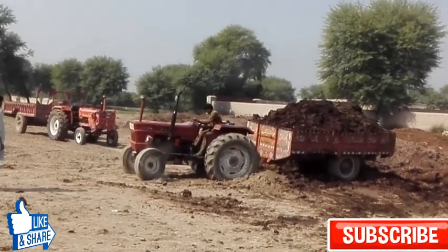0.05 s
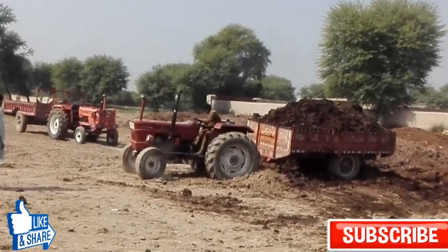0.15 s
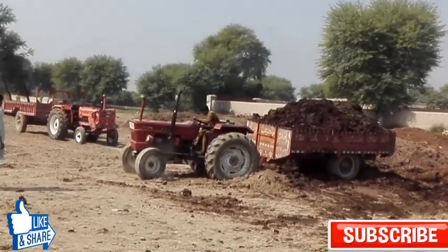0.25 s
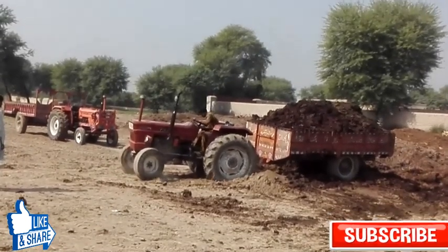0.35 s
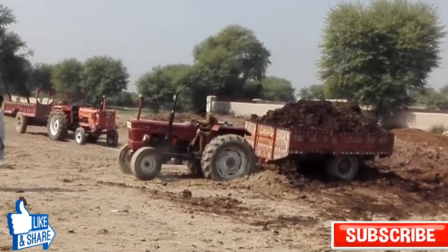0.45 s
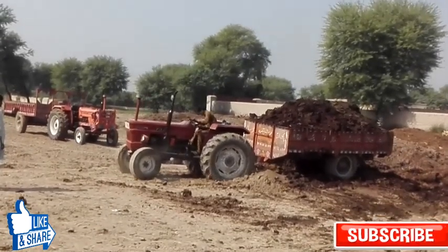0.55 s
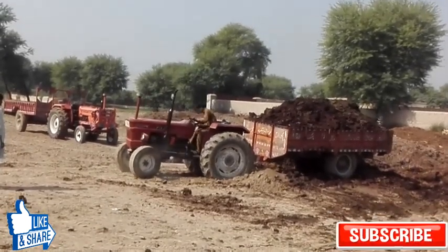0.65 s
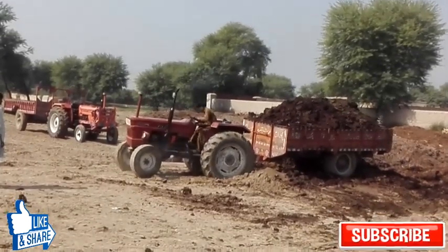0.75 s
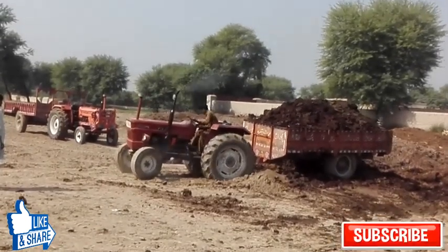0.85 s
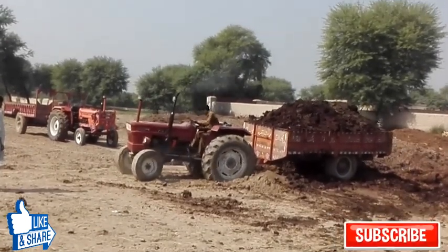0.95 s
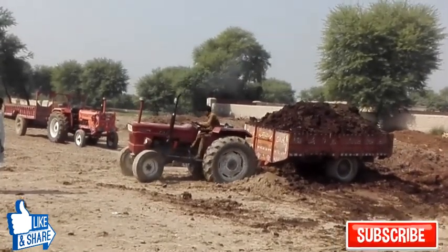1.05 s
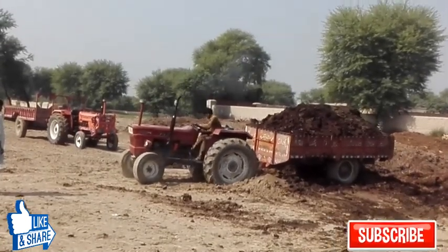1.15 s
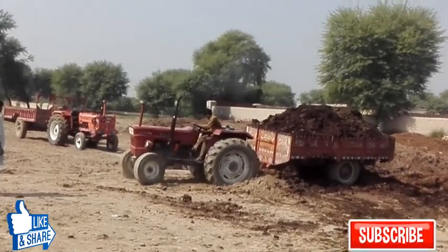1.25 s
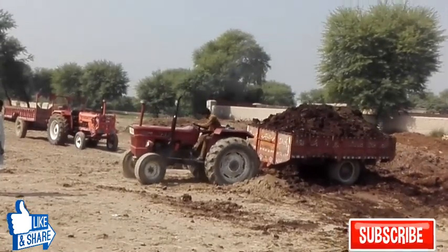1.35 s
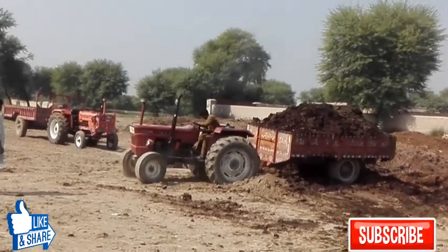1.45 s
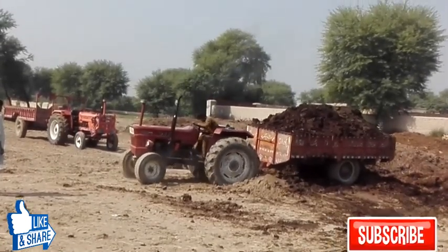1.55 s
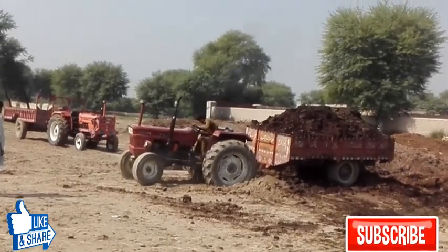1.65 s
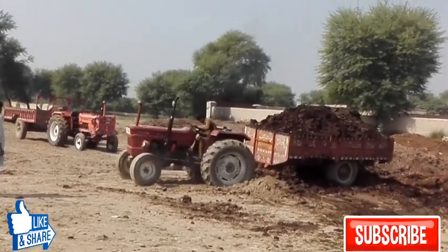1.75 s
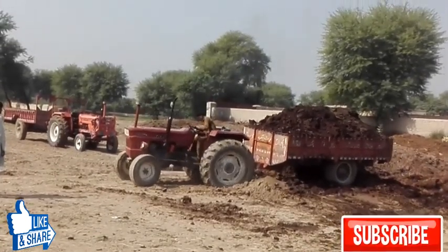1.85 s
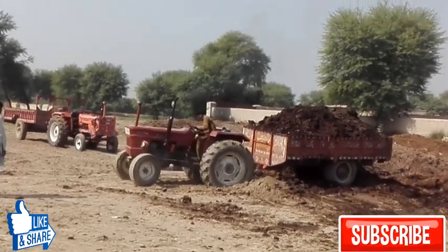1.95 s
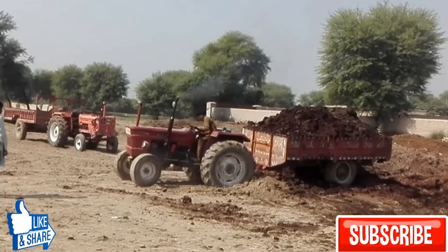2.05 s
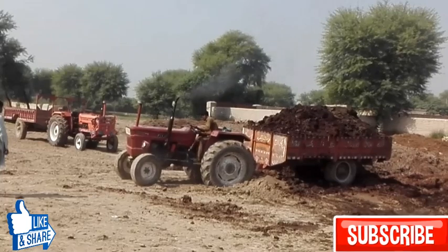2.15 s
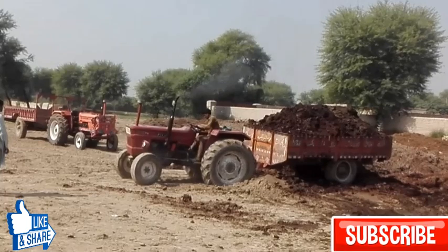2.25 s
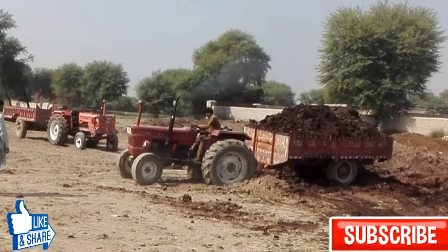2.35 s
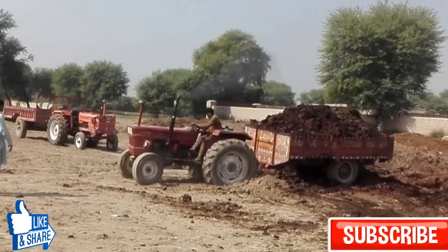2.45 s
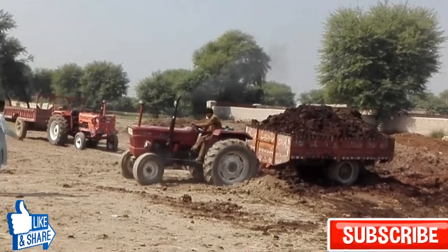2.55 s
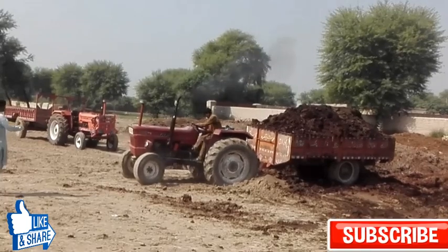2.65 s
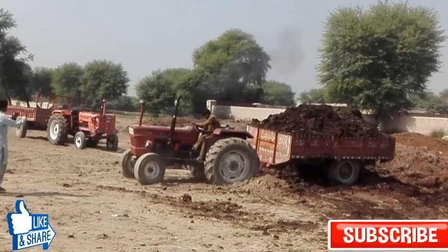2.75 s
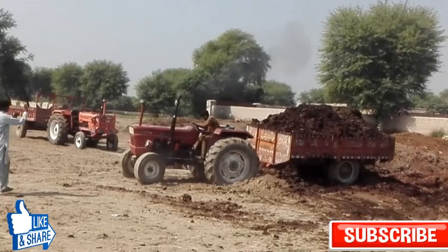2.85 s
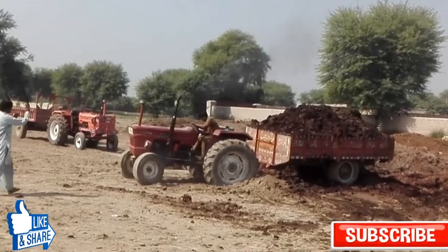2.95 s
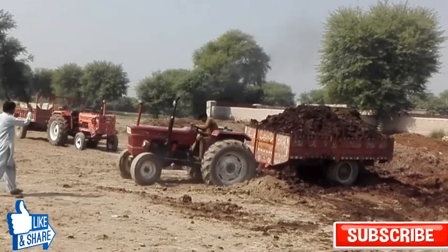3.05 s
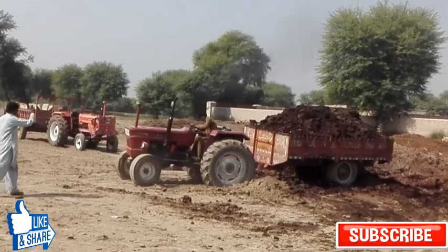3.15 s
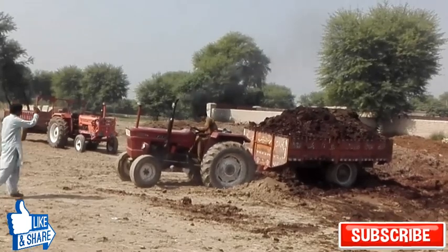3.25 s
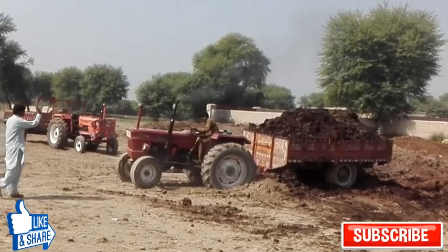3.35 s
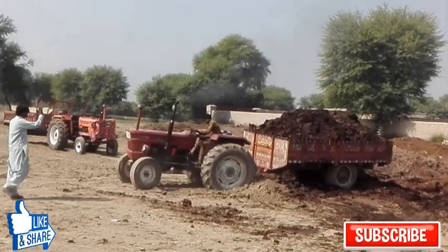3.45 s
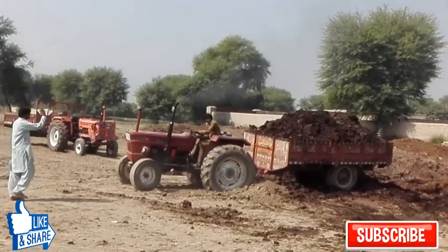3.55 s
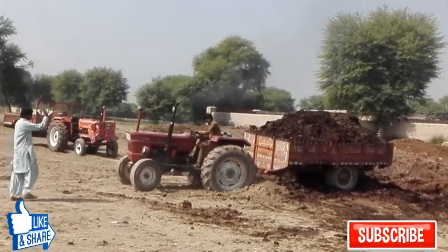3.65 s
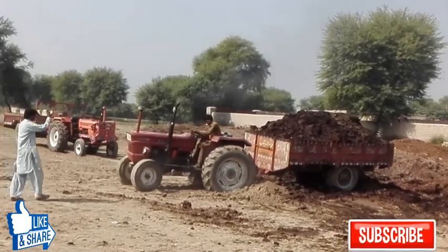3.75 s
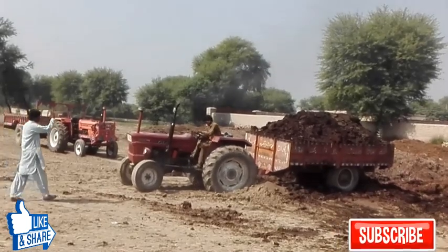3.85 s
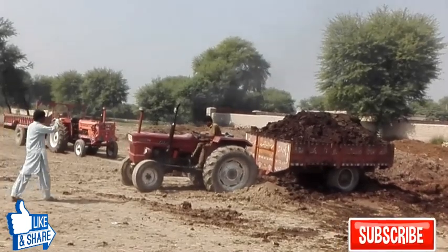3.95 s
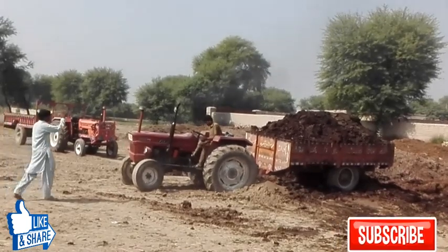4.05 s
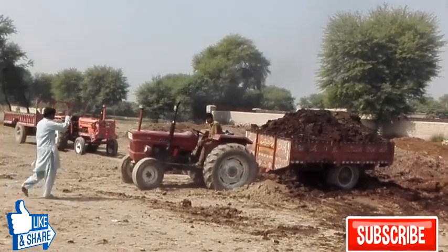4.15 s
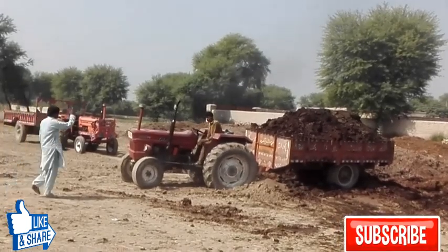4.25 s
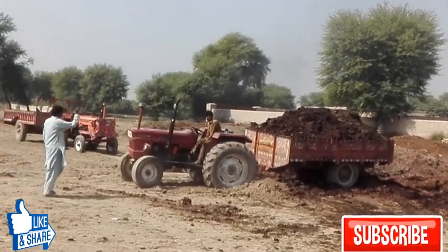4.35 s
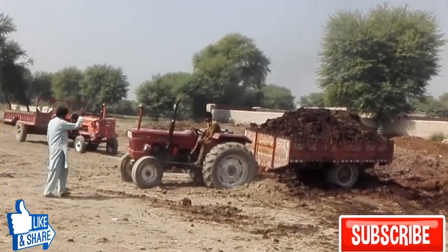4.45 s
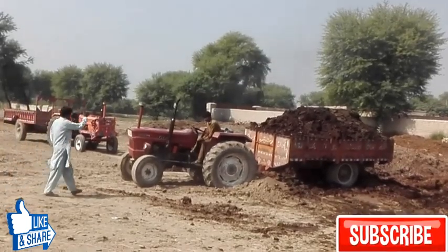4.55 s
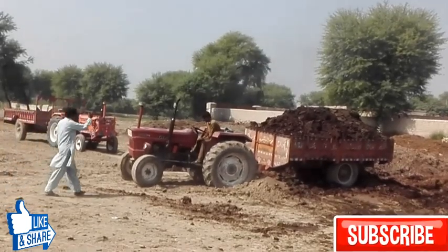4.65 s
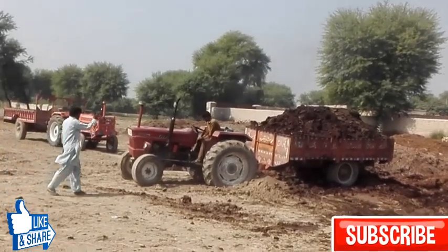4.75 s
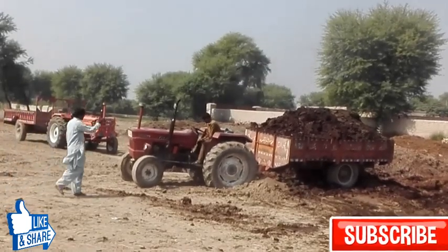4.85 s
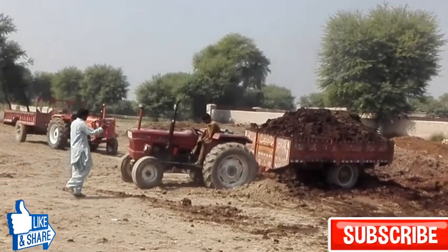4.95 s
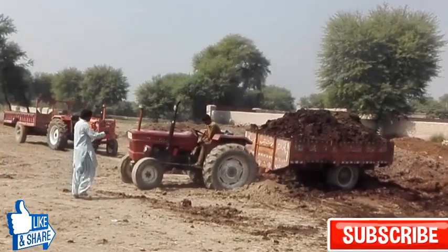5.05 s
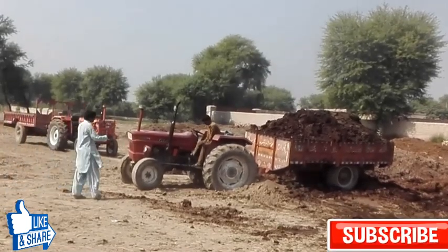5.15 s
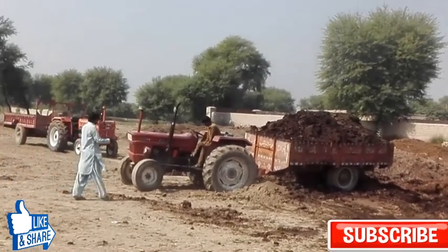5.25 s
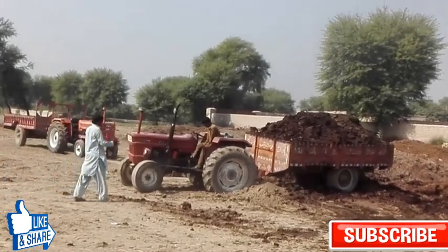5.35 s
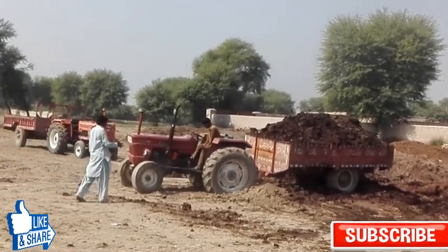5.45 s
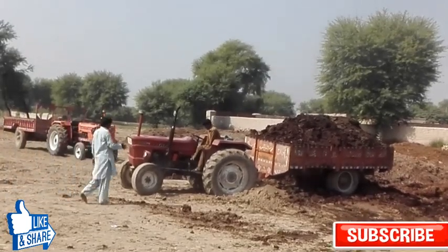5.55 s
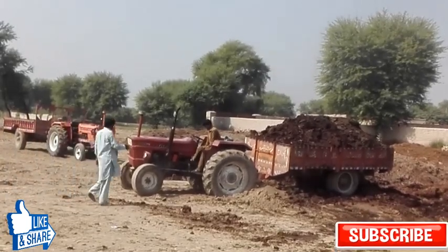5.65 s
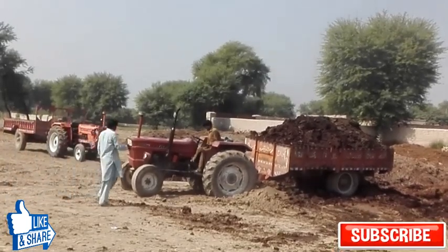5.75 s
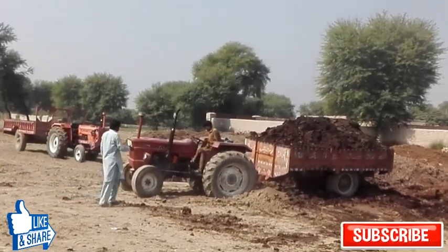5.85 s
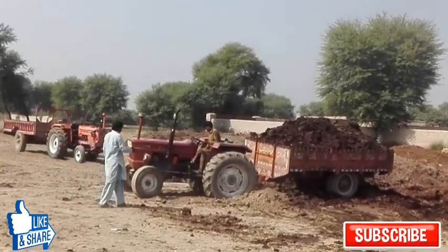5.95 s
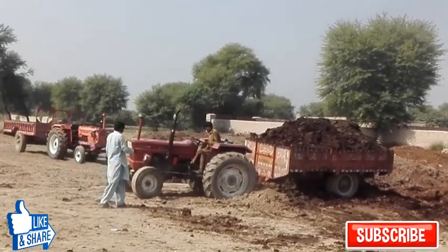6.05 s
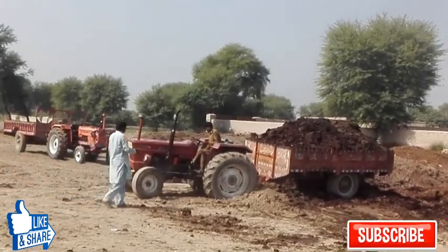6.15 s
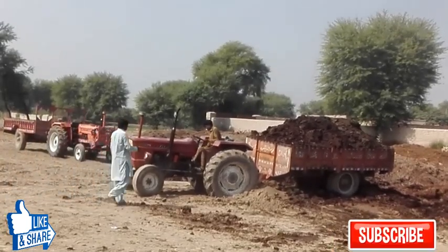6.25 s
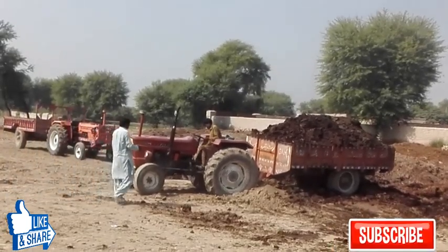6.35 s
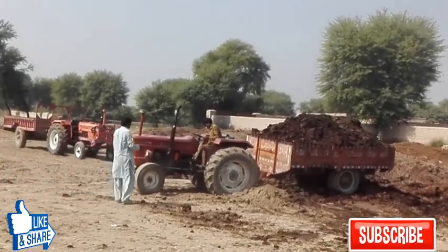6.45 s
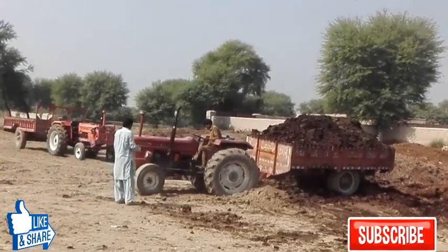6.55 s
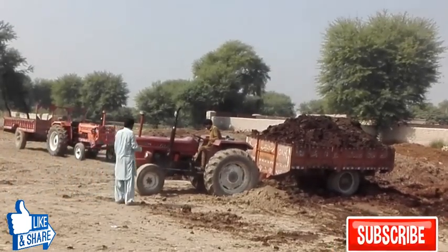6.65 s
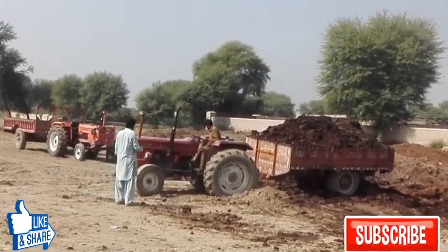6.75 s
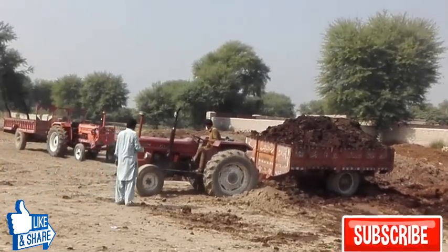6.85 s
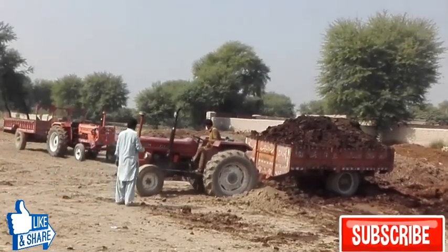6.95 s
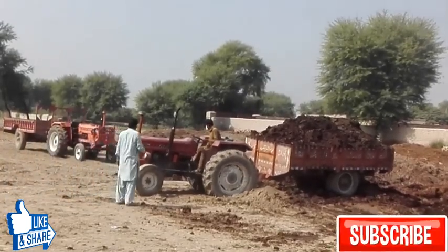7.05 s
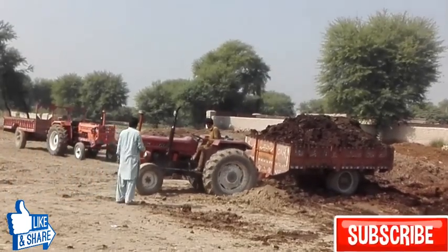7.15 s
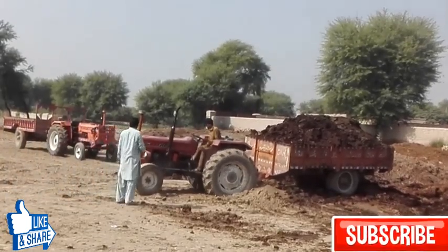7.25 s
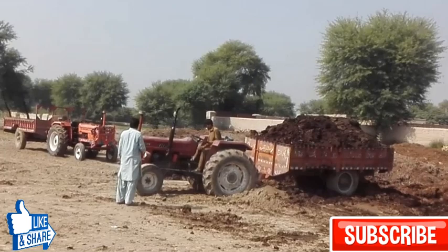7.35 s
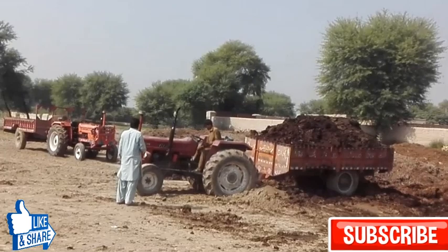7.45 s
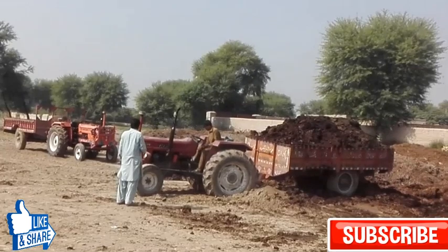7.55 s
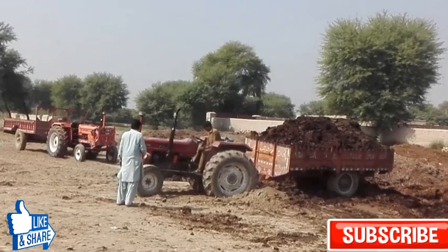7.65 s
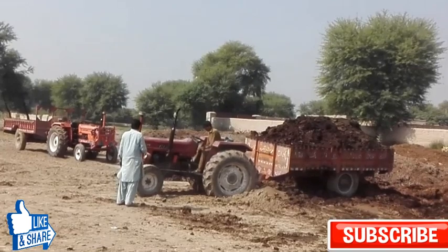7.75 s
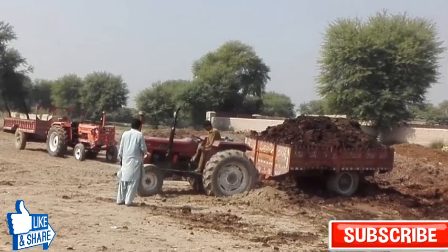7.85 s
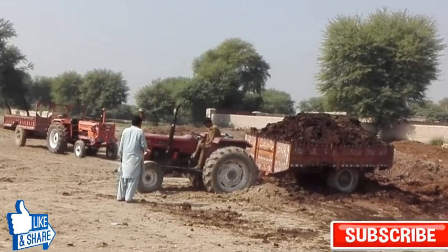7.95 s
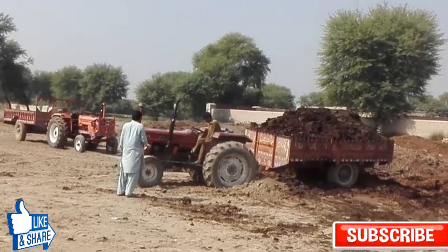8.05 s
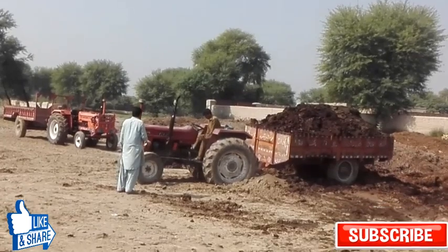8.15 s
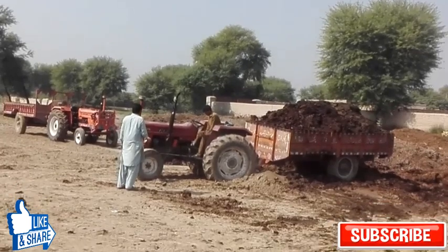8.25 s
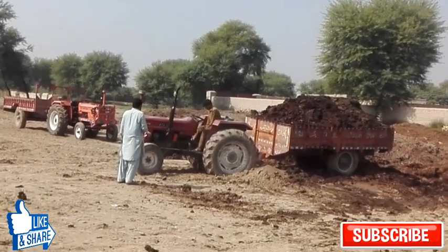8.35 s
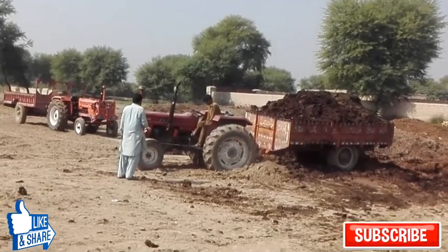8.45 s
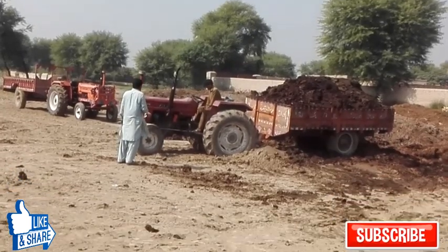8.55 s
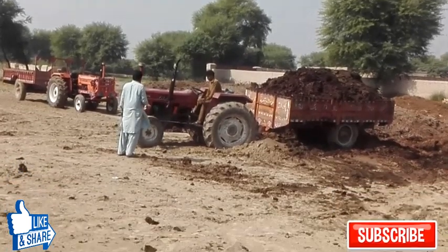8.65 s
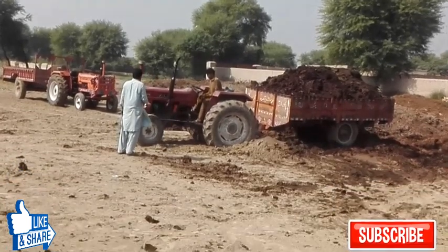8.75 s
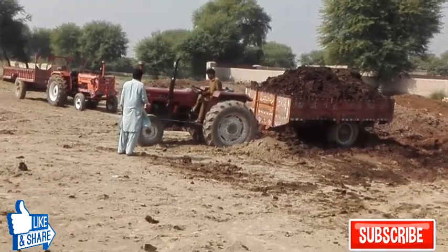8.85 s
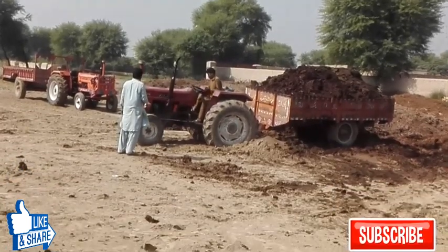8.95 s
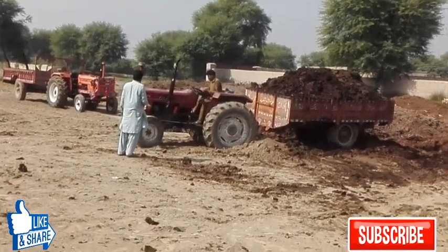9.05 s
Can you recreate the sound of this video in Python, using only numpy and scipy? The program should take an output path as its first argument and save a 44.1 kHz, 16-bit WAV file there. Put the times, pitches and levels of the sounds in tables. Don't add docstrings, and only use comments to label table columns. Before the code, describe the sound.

Straining tractor diesel revs up and drops back in waves, clattering hard, trailer hitch banging early on, then a gear whine before it nearly dies and picks up.

```python
import sys
import numpy as np
from scipy import signal
from scipy.fft import rfft, irfft
from scipy.io import wavfile
from scipy.ndimage import uniform_filter1d

SR = 44100
rng = np.random.default_rng(int(sys.argv[2]) if len(sys.argv) > 2 else 0)


def voltage_ratio(decibels):
    exponent = np.asarray(decibels, float) / 20
    return 10 ** exponent


def dump(signal):
    limited = np.clip(np.atleast_2d(signal).T, -1, 1)
    pcm = np.round(limited * 32767).astype(np.int16)
    wavfile.write(sys.argv[1], SR, pcm)


N = 401751


def level(x):
    return x / np.sqrt(np.mean(x ** 2))


def curves(table, off=None):
    s, *columns = np.transpose(table)
    return [np.interp(np.arange(N) / SR, s, c, off, off) for c in columns]


def colour(x, points):
    size = 8192
    hz, db = np.transpose(points)
    bin_hz = np.arange(size // 2 + 1) * SR / size
    gain_db = np.interp(np.log(bin_hz + 1), np.log(hz), db)
    cepstrum = irfft(np.log(voltage_ratio(gain_db)))
    cepstrum[1:size // 2] *= 2
    cepstrum[size // 2 + 1:] = 0
    return signal.fftconvolve(x, irfft(np.exp(rfft(cepstrum))))[:N]


def walk(rate):
    hold = int(SR / rate)
    steps = np.repeat(rng.standard_normal(N // hold + 1), hold)
    return 1.045 * uniform_filter1d(uniform_filter1d(steps, hold), hold)[:N]


def add(out, start_s, sound):
    i = int(start_s * SR)
    out[i:i + len(sound)] += sound[:N - i]


def speed():
    # time in seconds, firing rate in Hz.
    turning_points = [(0, 64.6), (.3, 59.2), (.44, 58.2), (1.122, 81), (1.5, 69), (1.882, 69.56),
                      (2.419, 84.5), (2.86, 69.86), (3.199, 68.5), (3.708, 84), (5.25, 44.4), (5.728, 45.2),
                      (5.96, 60.3), (6.07, 63.56), (6.921, 66.5), (8.22, 38), (8.55, 38), (9.11, 47.3)]
    friction_hz, flywheel_s = 8.06, 0.078
    climb = curves(turning_points)[0]
    log_drag = curves([(s, np.log(hz + friction_hz)) for s, hz in turning_points])[0]
    sag = np.exp(log_drag) - friction_hz
    hz = np.where(np.gradient(climb) < 0, sag, climb)
    return uniform_filter1d(hz, size=int(flywheel_s * SR), mode="nearest")


def rack():
    # start in seconds, fuel afterwards from 0 to 1, travel time in seconds.
    moves = [(.15, 0.35, 0.088), (.38, 0.88, 0.18), (.93, .26, 0.17), (1.08, 0.03, .14), (1.44, 0.2, 0.1),
             (1.64, 0.62, 0.064), (1.86, 0.89, 0.042), (2.31, 0, 0.12), (2.8, 0.15, .15),
             (3.0, 0.54, 0.042), (3.2, 0.94, 0.11), (3.62, 0, 0.13), (5.241, 0.38, .06),
             (5.745, 0.86, .015), (5.985, 0.52, 0.028), (6.78, 0.35, 0.14), (6.92, 0, .04),
             (8.2, 0.09, 0.12), (8.36, 0.34, .1), (9.039, 0.76, .04)]
    t, fuel, last = np.arange(N) / SR, np.zeros(N), 0
    for s, after, travel_s in moves:
        fuel += (after - last) * np.clip((t - s) / travel_s, 0, 1)
        last = after
    return np.clip(fuel, 0, 1)


def crank(hz):
    # time in seconds, level in dB over a usual strike.
    strikes = [(.549, -8), (.806, 5), (1.0, 8.5), (2.07, -5), (2.325, -10), (5.757, 2.5), (5.818, 3.5),
               (5.837, 4.5), (5.876, 1), (5.912, 4.5), (5.964, 1.5), (5.981, 0.5), (8.18, 4), (8.284, 1),
               (8.390, 2), (8.496, 6), (8.598, 3), (8.822, -1), (9.053, 2), (9.096, 3.5)]
    cylinder_db = [1.0, -.8, .4, -.6]
    strike_s, strike_db = np.transpose(strikes)
    turns = np.cumsum(hz) / SR
    at = turns[(strike_s * SR).astype(int)]
    size_db = 1.2 * rng.standard_normal(N // 400) + np.resize(cylinder_db, N // 400)
    firing = np.round(at[0]) + np.cumsum(np.round(np.diff(at, prepend=at[0])))
    size_db[firing.astype(int)] = strike_db
    nudge = np.interp(np.arange(N) / SR, strike_s, firing - at)
    return turns + nudge, voltage_ratio(size_db)


def law(octave, fuel, wheelspin, mid_db, oct_db, fuel_db, spin_db, floor_db):
    bite = 1.8
    lug = 0.36
    fuel_part = fuel_db * fuel ** bite * (1 - lug * octave)
    working_db = mid_db + oct_db * octave + fuel_part + spin_db * wheelspin
    return 10 * np.log10(voltage_ratio(working_db) ** 2 + voltage_ratio(floor_db) ** 2)


def stack(hz, fire, pump):
    # firing rate in Hz, first order firing level in dB, its pumping level in dB,
    # second order firing level in dB, its pumping level in dB.
    response = [(38, -31, -29, -34, -38.5), (47, -30.5, -26, -25, -32), (54, -21, -26, -24, -33),
                (65.4, -24.5, -24, -30.5, -34), (68.5, -26, -22, -33, -32), (72.3, -26.5, -18, -33.5, -34),
                (81, -26, -16.5, -25, -30)]
    at_hz, *columns = np.transpose(response)
    fire1, pump1, fire2, pump2 = (voltage_ratio(np.interp(hz, at_hz, db)) for db in columns)
    first = fire1 * fire - pump1 * pump + voltage_ratio(-35.5)
    second = fire2 * fire ** 1.4 + pump2 * pump + voltage_ratio(-49.5)
    return first * voltage_ratio(1.3 * walk(12)), second * voltage_ratio(1.6 * walk(24))


def exhaust(hz, turns, octave, fuel, fire, pump, wheelspin):
    # multiple of the firing
    # rate, level in dB over the rumble.
    orders = [(0.5, -4), (0.748, -9), (1.25, -7.5), (1.5, -1), (1.75, -9), (2.25, -13.5), (2.5, -10),
              (2.75, -6), (3, -5), (3.5, -7.5), (4, -4.5), (5, -9), (8.2, -18.5)]
    # frequency in Hz, gain in dB.
    pipe = [(25, -4), (45, -3.5), (90, 2), (180, 2.5), (230, -3), (300, -11.5), (650, -0.5)]
    # frequency in Hz, level in dB per Hz.
    rumble = [(18, -31), (35, -19.5), (70, -2), (125, -7), (180, 0.5), (250, -8), (320, -6), (480, -16),
              (620, -18.5), (820, -33), (1100, -24), (2500, -90)]
    # dB at mid speed without fuel, dB per octave of speed, dB for full fuel,
    # dB for spinning wheels, floor in dB.
    rumble_law = (-35, 7, 1, -8, -44)
    uneven_db = -5.5 * fire - 4.5 * pump + 3.5 * wheelspin + 5 * octave
    whole_db = -0.5 + 8 * octave
    roar_db = -0.5 + fuel + 5.5 * wheelspin + 5.5 * octave
    rumble_db = law(octave, fuel, wheelspin, *rumble_law)

    phase = 2 * np.pi * (turns - .2)
    first, second = stack(hz, fire, pump)
    boom = first * np.sin(phase) + second * np.sin(2 * phase + .6)

    pipe_hz, pipe_db = np.transpose(pipe)
    uneven = 0
    for k, db in orders:
        db = db + np.interp(np.log(k * hz), np.log(pipe_hz), pipe_db)
        db = db + 2.7 * walk(7) + 1.4 * walk(2.44)
        db = db + (uneven_db if k % 1 and k < 4 else whole_db)
        wobble = 2 * np.pi * rng.random() + 0.31 * walk(5)
        uneven = uneven + voltage_ratio(db) * np.sin(k * phase + wobble)

    puffs = (1 + 0.09 * np.cos(phase)) * voltage_ratio(0.93 * walk(9.9))
    gas = level(colour(rng.standard_normal(N) * puffs, rumble))
    low = signal.sosfiltfilt(signal.butter(2, 305, fs=SR, output="sos"), gas)
    gas = low + voltage_ratio(roar_db) * (gas - low)
    return np.sqrt(2) * (boom + voltage_ratio(rumble_db) * uneven) + voltage_ratio(rumble_db + 2.1) * gas


def knock_share(octave, fire, pump, wheelspin):
    coasting, idling, full_fuel, per_octave = .07, .11, .5, -1.05
    share = idling + (coasting - idling) * pump
    share = share + fire * (full_fuel + per_octave * octave - idling)
    share = share - .2 * np.minimum(octave, 0) * (1 - fire)
    return np.clip(share * (1 - .7 * wheelspin), 0, 1)


def block(turns, size, share, octave, fuel, wheelspin):
    # frequency in Hz, level in dB per Hz.
    clatter = [(400, -55.5), (700, -8.5), (850, -11.5), (1050, -6), (1350, 0.5), (1600, -4.5), (1800, -10),
               (2400, -7.5), (3000, -7), (3700, -10), (4500, -15), (6000, -23), (12000, -54)]
    treble = [(3000, -34), (4500, -5.5), (5300, 2.5), (6500, -1), (8000, -3.5), (10500, -25.5),
              (15000, -52)]
    fizz = [(6500, -24), (8800, 2), (11000, 4), (12500, -0.5), (13500, -2.5), (16000, -15)]
    # dB at mid speed without fuel, dB per octave of speed, dB for full fuel,
    # dB for spinning wheels, floor in dB.
    block_law = [
        (-36, 13.9, 3.52, 4, -46),
        (-46, 11.6, 5.1, 4.6, -59),
        (-49.5, 12.5, 6, .2, -58),
    ]
    # frequency in Hz, level in dB, time to fall 60 dB in seconds.
    wall_modes = [(1384, 1, 0.025), (1530, -1, 0.078), (2064, 2, 0.032), (2622, 1, 0.036),
                  (3285, -3, 0.067), (3860, -6, 0.05), (5300, -30, 0.013)]
    band_db = [law(octave, fuel, wheelspin, *row) for row in block_law]

    firing, phase = np.divmod(turns, 1)
    strength = size[firing.astype(int)]
    rise, fall = .08, .18
    knock = strength * (1 - np.exp(-phase / rise)) * np.exp(-phase / fall)
    valve = .22 * np.exp(-np.mod(phase + .5, 1) / fall)
    strikes = np.sqrt(share) * level(knock + valve)
    rattle = 0
    for points, db in zip((clatter, treble, fizz), band_db):
        steady = np.sqrt(1 - share) * voltage_ratio(1.22 * walk(30))
        shake = rng.standard_normal(N) * (strikes + steady)
        rattle = rattle + voltage_ratio(db + 0.16 * walk(12)) * level(colour(shake, points))

    t = np.arange(SR // 20) / SR
    walls = sum(voltage_ratio(db) * 1000 ** (-t / t60) * np.sin(2 * np.pi * hz * t) for hz, db, t60 in wall_modes)
    walls = signal.sosfilt(signal.butter(3, [950, 7000], "bandpass", fs=SR, output="sos"), walls)
    jump = (knock / strength ** .5) ** 2.2 * rng.standard_normal(N)
    ringing = share * level(signal.fftconvolve(jump, walls)[:N])

    hum_phase = 2 * np.pi * 740 * np.arange(N) / SR + 1.95 * walk(6.6)
    panel = voltage_ratio(-33 + 4.4 * walk(5.1)) * np.sin(hum_phase)
    return rattle + voltage_ratio(band_db[0]) * (voltage_ratio(2.5) * ringing + panel)


def gear():
    # time in seconds, frequency in Hz, level in dB.
    whine = [
        (6.15, 1395, -48),
        (6.3, 1440, -42),
        (6.4, 1438, -53),
        (6.5, 1465, -41),
        (6.65, 1488, -36.5),
        (6.85, 1493, -40),
        (6.92, 1488, -49),
    ]
    hz, db = curves(whine)
    on = uniform_filter1d(curves(whine, off=0)[0] / hz, size=2000)
    phase = 2 * np.pi * np.cumsum(hz * (1 + 0.00105 * walk(13))) / SR
    return np.sqrt(2) * on * voltage_ratio(db) * (np.sin(phase) + voltage_ratio(-4.5) * np.sin(2 * phase))


def ironwork():
    # time in seconds, peak in dB, centre in Hz, time to fall 60 dB in seconds.
    clanks = [
        (.377, -28, 8700, 0.055),
        (.497, -40, 5500, 0.071),
        (.672, -20.5, 4300, 0.06),
        (1.0, -24, 3480, 0.053),
        (1.652, -28, 6990, 0.044),
        (1.828, -17, 2870, 0.23),
        (1.849, -22, 5000, 0.066),
        (1.930, -24, 5750, .07),
        (4.597, -29, 10000, .05),
        (5.27, -36, 3900, .08),
    ]
    # time in seconds, peak in dB, centre in Hz, time to fall 60 dB in seconds.
    thuds = [
        (1.8, -24, 340, 0.41),
        (1.93, -21, 200, 0.086),
        (2.2, -24, 60, 0.26),
        (3.065, -14, 110.6, 0.058),
        (3.095, -17, 89.55, 0.063),
        (6.95, -24, 85.7, .1),
        (1.70, -19, 193, 0.36),
        (.672, -20.5, 280, 0.087),
    ]
    # time in seconds, peak in dB, frequency in Hz, time to fall 60 dB in seconds.
    pings = [(.377, -38, 7850, 0.099), (.497, -37, 7850, 0.086), (.672, -36, 10300, .04),
             (1.651, -28.5, 7760, 0.11), (1.652, -38, 11700, .04), (1.705, -31, 634, 0.23),
             (1.831, -24, 3670, 0.091), (1.849, -24, 3220, 0.073), (1.851, -28, 5300, 0.059),
             (1.852, -28, 6100, 0.062), (1.829, -33, 4250, .07), (1.83, -31, 5050, 0.059),
             (1.832, -28, 2680, .08), (4.597, -40, 8600, 0.046)]
    # start in seconds, end in seconds, first Hz, last Hz, level in dB.
    squeaks = [
        (0.321, 0.377, 12940, 12300, -48),
        (.585, .635, 9500, 9580, -40),
        (1.59, 1.65, 12920, 12150, -45),
        (4.57, 4.612, 11910, 11440, -47),
    ]
    out, t = np.zeros(N), np.arange(SR // 2) / SR
    for table, spread in ((clanks, 2.7), (thuds, 1.5)):
        for s, db, hz, t60 in table:
            edges = [hz / spread, min(hz * spread, .45 * SR)]
            band = signal.butter(2, edges, "bandpass", fs=SR, output="sos")
            fade = 1000 ** (-t / t60) * (1 - np.exp(-t / 0.0015))
            burst = signal.sosfilt(band, rng.standard_normal(len(t)) * fade)
            add(out, s, voltage_ratio(db) * burst / np.abs(burst).max())
    for s, db, hz, t60 in pings:
        add(out, s, voltage_ratio(db) * 1000 ** (-t / t60) * np.sin(2 * np.pi * hz * t))
    for s, end, from_hz, to_hz, db in squeaks:
        u = np.arange(int((end - s) * SR)) / ((end - s) * SR)
        glide_hz = from_hz + (to_hz - from_hz) * u ** 2
        tone = np.sin(2 * np.pi * np.cumsum(glide_hz) / SR)
        add(out, s, voltage_ratio(db) * np.sqrt(np.sin(np.pi * u)) * tone)
    return out


def field(iron):
    t = np.arange(SR // 4) / SR
    scatter = rng.standard_normal(len(t)) * 1000 ** (-t / 0.041) * (t > .004)
    scatter = scatter / np.sqrt(np.sum(scatter ** 2))
    return iron + voltage_ratio(-13.0) * signal.fftconvolve(iron, scatter)[:N]


def scene():
    hz, fuel = speed(), rack()
    octave = np.log2(hz / 64)
    even_fuel = 0.44
    fire = np.clip((fuel - even_fuel) / (1 - even_fuel), 0, 1)
    pump = np.clip(1 - fuel / even_fuel, 0, 1)
    wheelspin = np.interp(np.arange(N) / SR, [6, 6.6, 6.84, 6.95], [0, 1, 1, 0])
    turns, size = crank(hz)
    share = knock_share(octave, fire, pump, wheelspin)
    gas = exhaust(hz, turns, octave, fuel, fire, pump, wheelspin)
    iron = block(turns, size, share, octave, fuel, wheelspin) + gear() + ironwork()
    return gas[None] + voltage_ratio(1.37) * field(iron)


def band_limit(x):
    return signal.sosfilt(signal.butter(12, 14670, fs=SR, output="sos"), x)


def record(dry):
    thin = signal.sosfilt(signal.butter(2, 28, "highpass", fs=SR, output="sos"), dry)
    below_top = np.arange(N // 2 + 1) * SR / N < 14260
    thin = irfft(rfft(thin) * below_top, N)
    return band_limit(thin)


dry = scene()
out = record(dry)
dump(out)
```